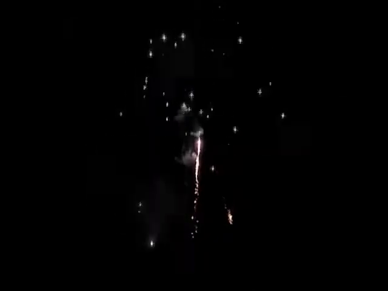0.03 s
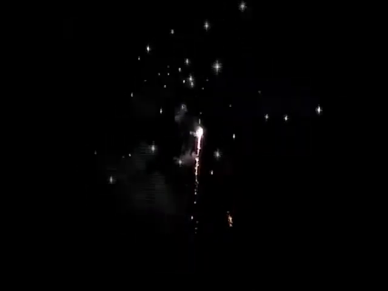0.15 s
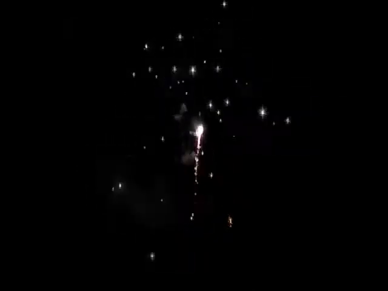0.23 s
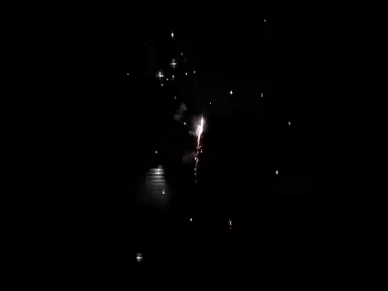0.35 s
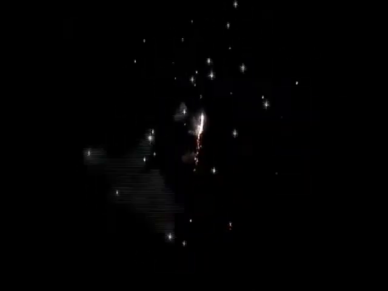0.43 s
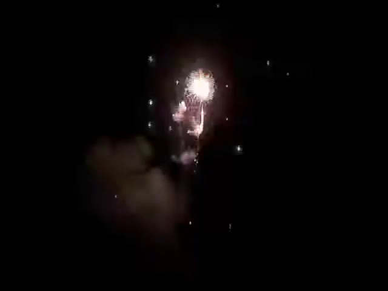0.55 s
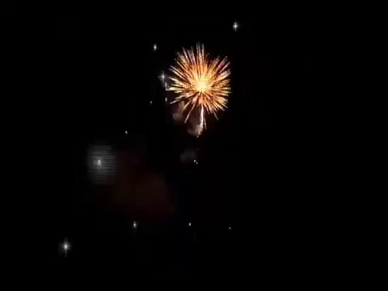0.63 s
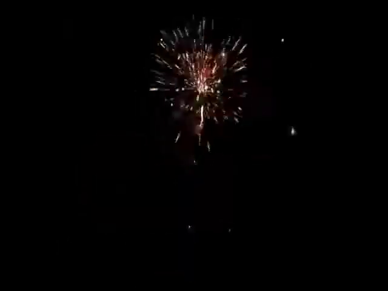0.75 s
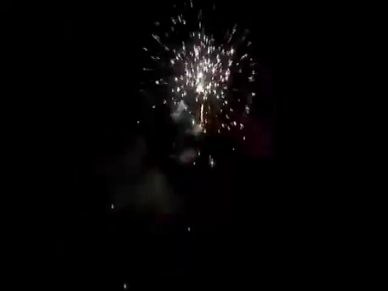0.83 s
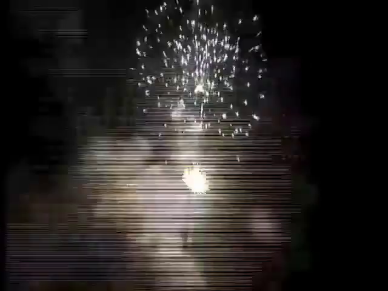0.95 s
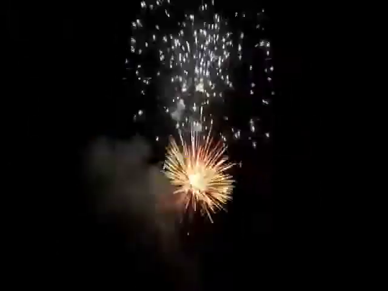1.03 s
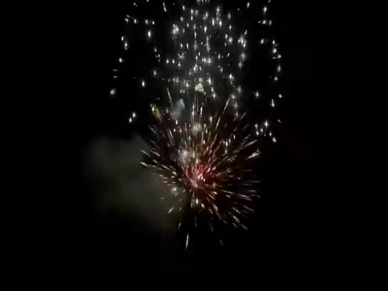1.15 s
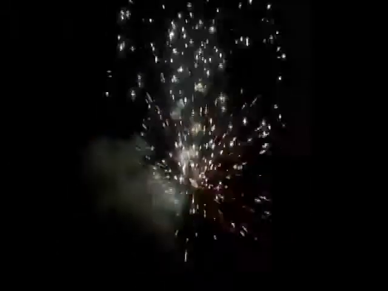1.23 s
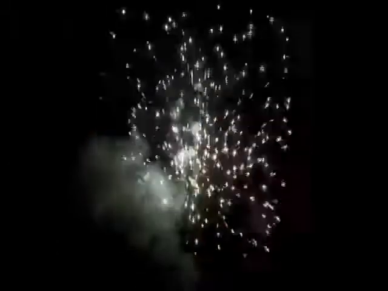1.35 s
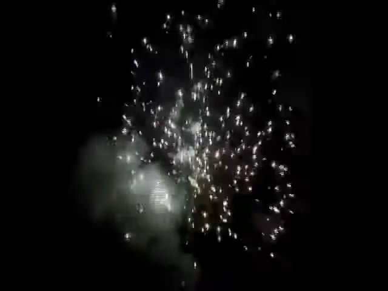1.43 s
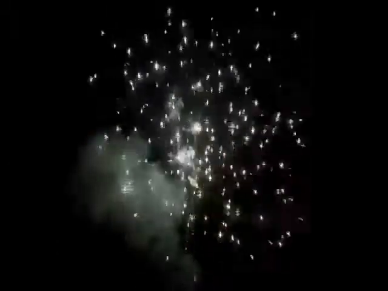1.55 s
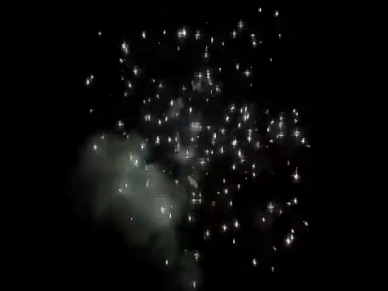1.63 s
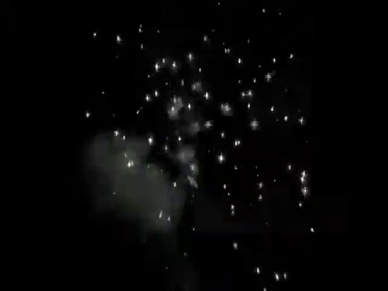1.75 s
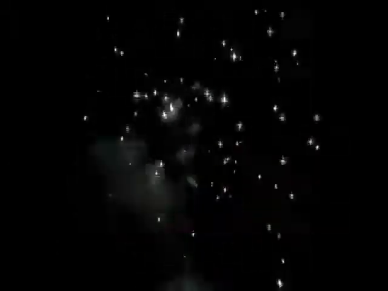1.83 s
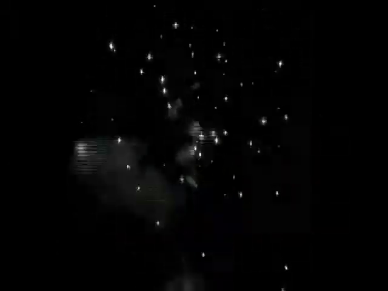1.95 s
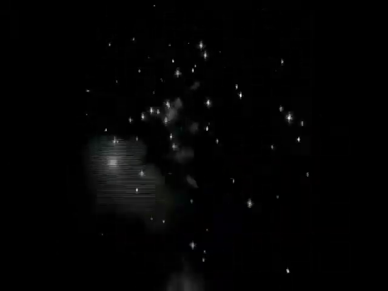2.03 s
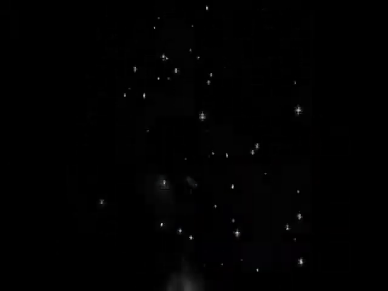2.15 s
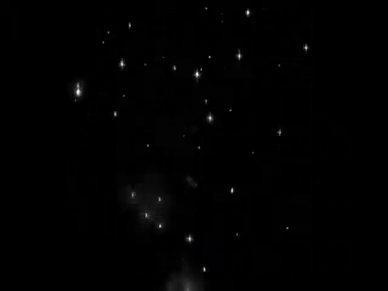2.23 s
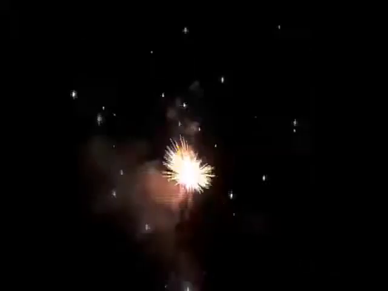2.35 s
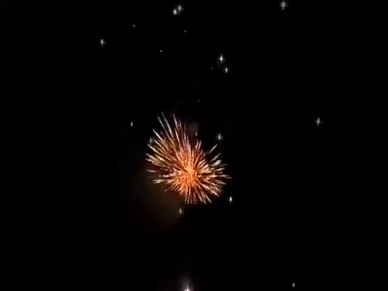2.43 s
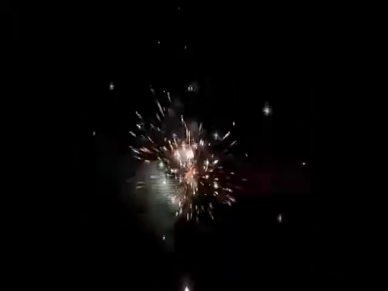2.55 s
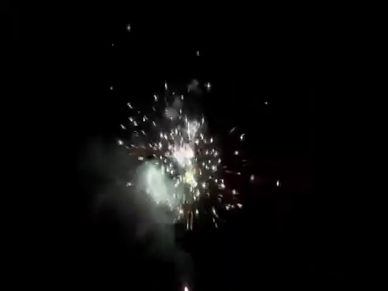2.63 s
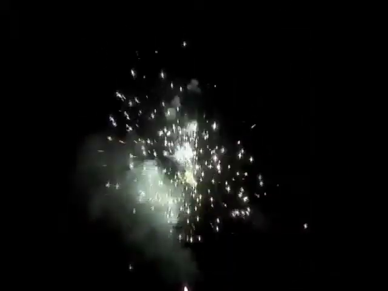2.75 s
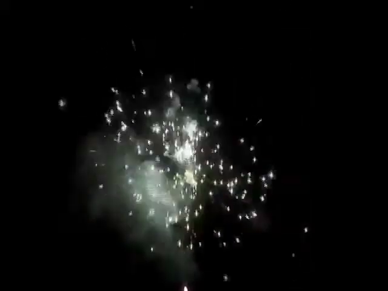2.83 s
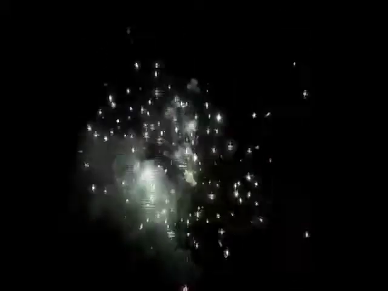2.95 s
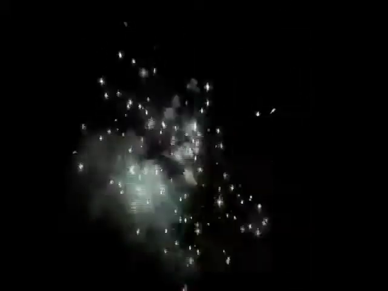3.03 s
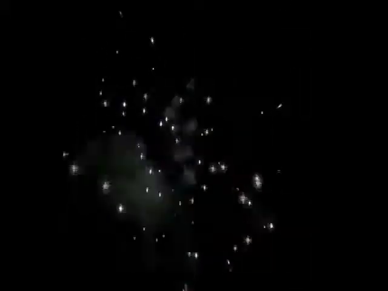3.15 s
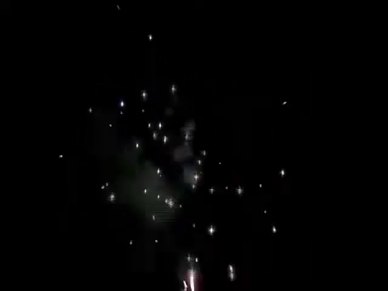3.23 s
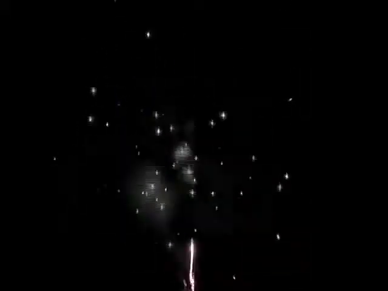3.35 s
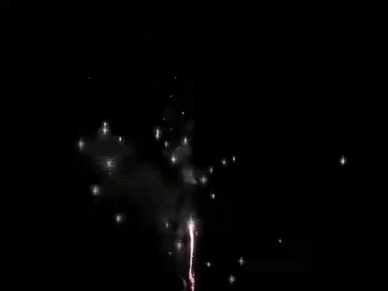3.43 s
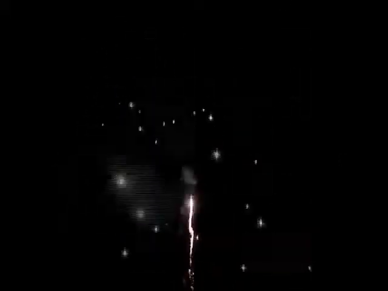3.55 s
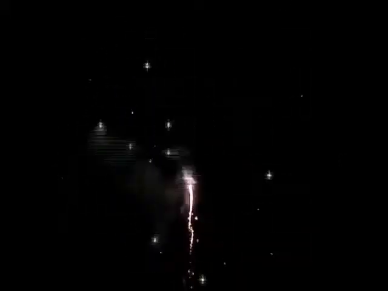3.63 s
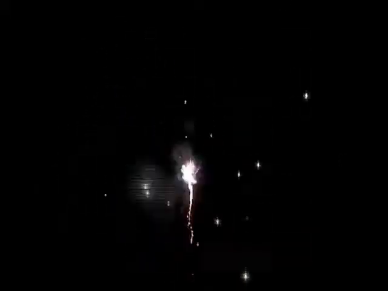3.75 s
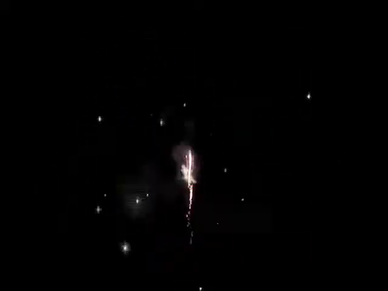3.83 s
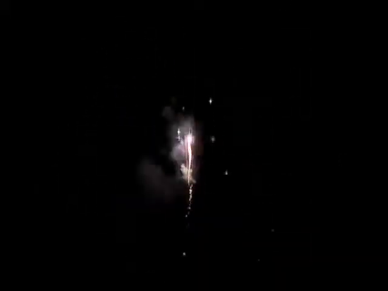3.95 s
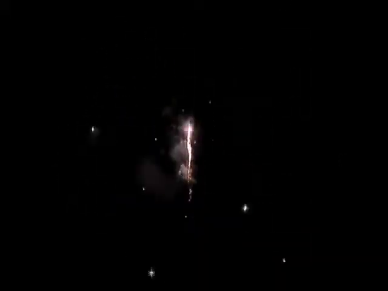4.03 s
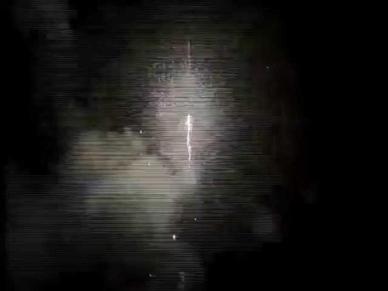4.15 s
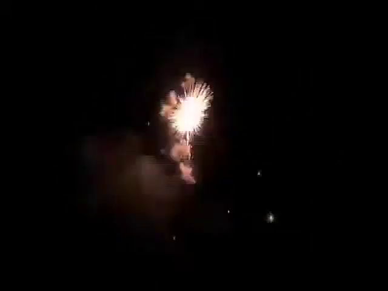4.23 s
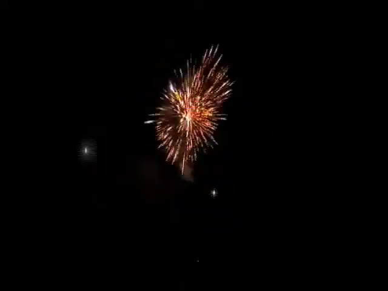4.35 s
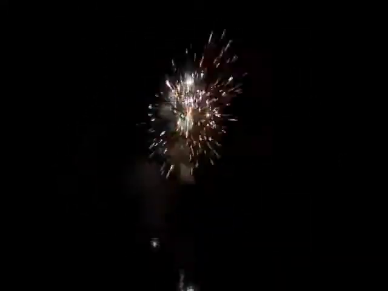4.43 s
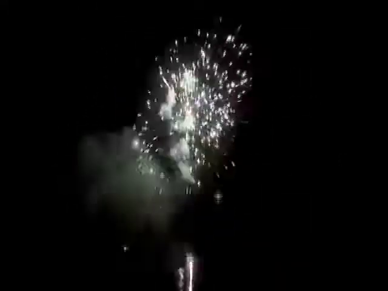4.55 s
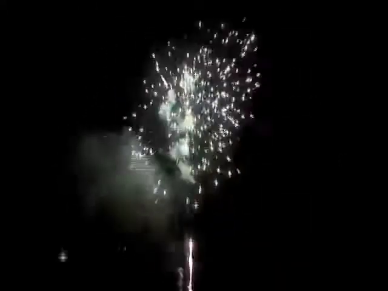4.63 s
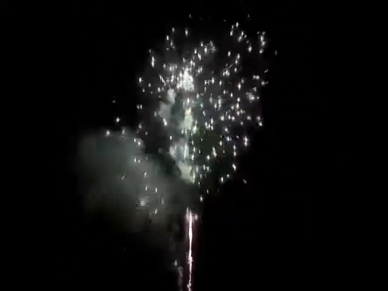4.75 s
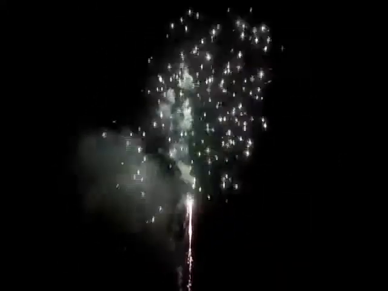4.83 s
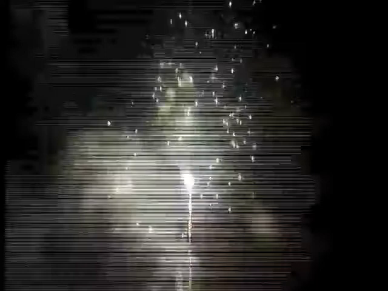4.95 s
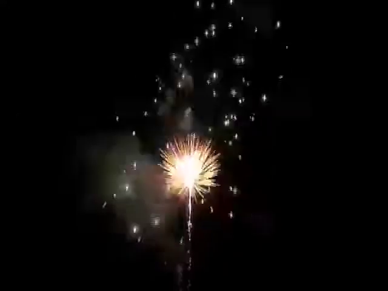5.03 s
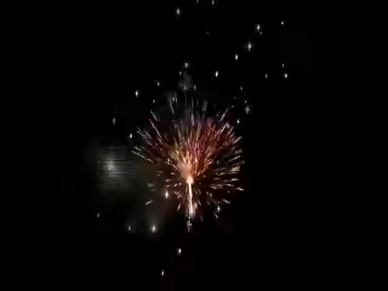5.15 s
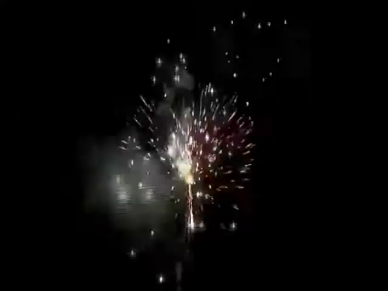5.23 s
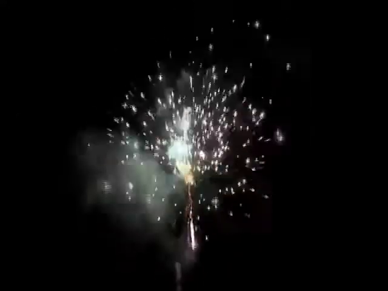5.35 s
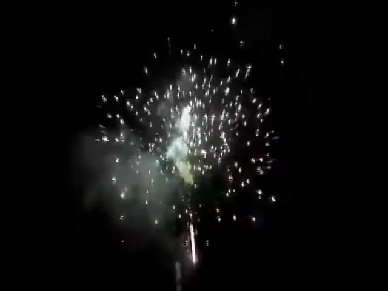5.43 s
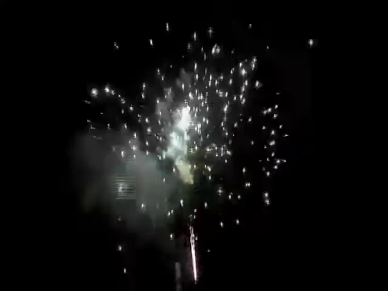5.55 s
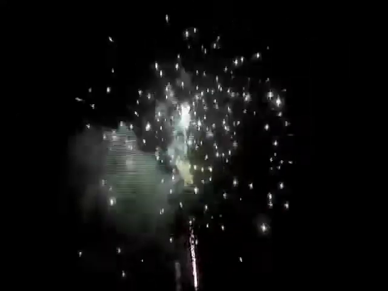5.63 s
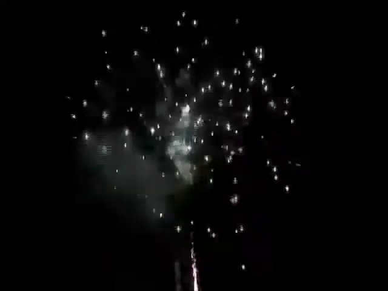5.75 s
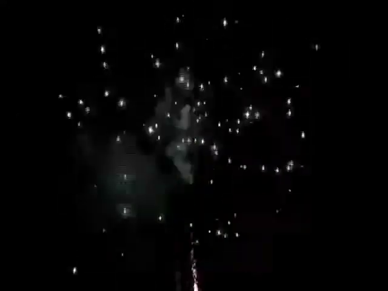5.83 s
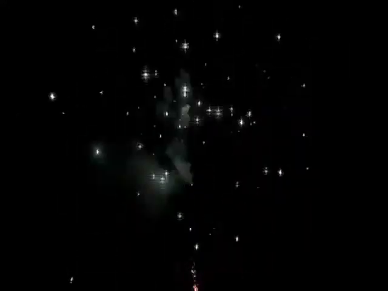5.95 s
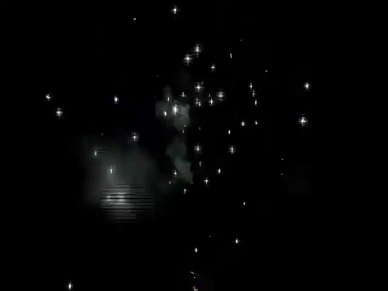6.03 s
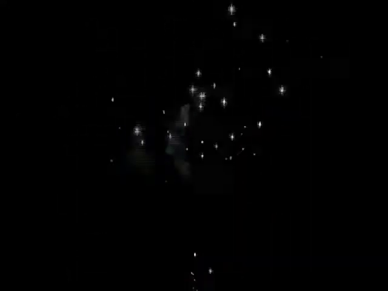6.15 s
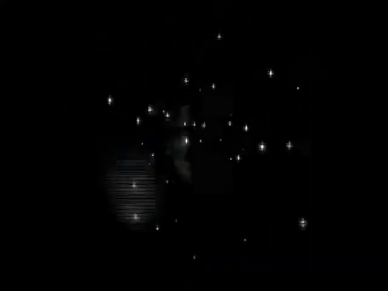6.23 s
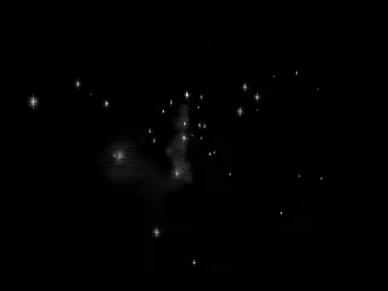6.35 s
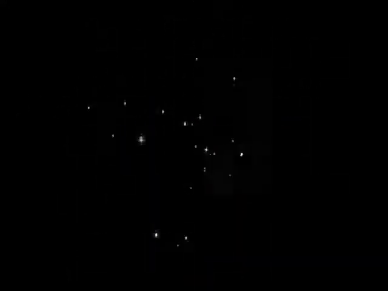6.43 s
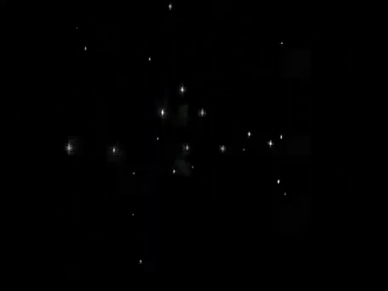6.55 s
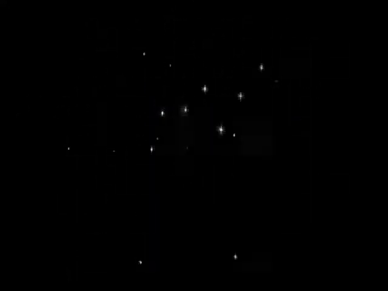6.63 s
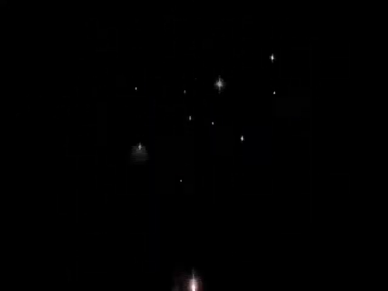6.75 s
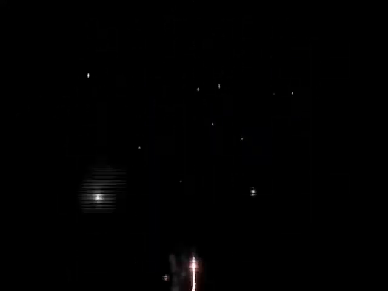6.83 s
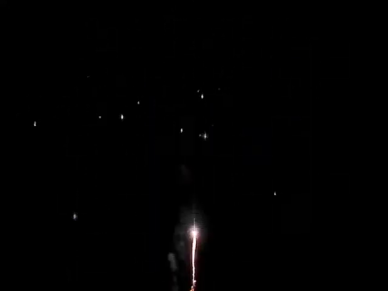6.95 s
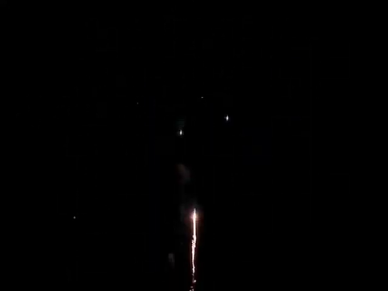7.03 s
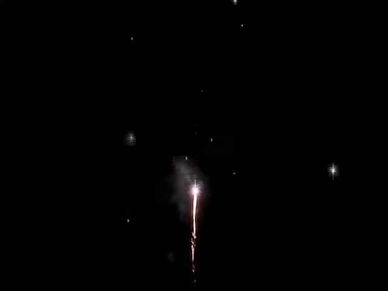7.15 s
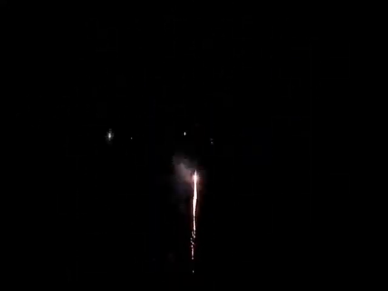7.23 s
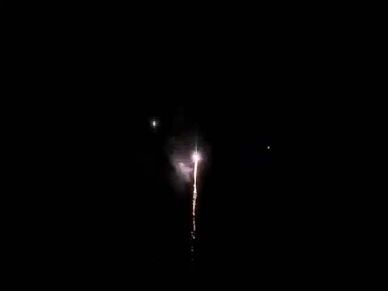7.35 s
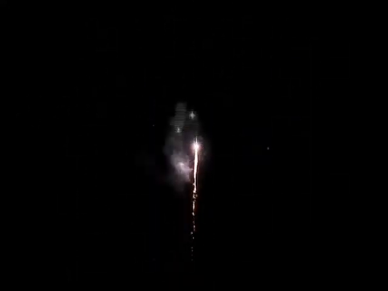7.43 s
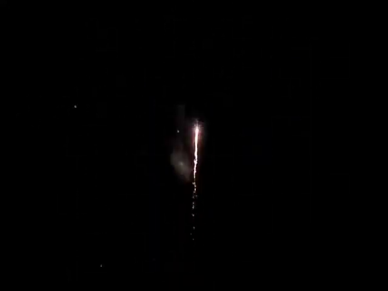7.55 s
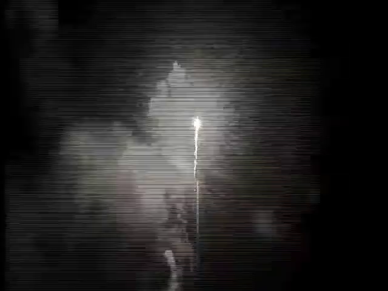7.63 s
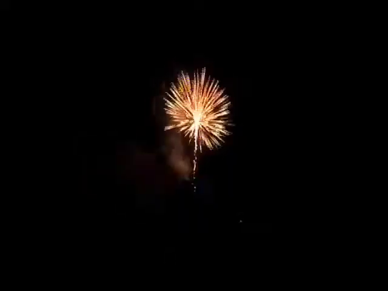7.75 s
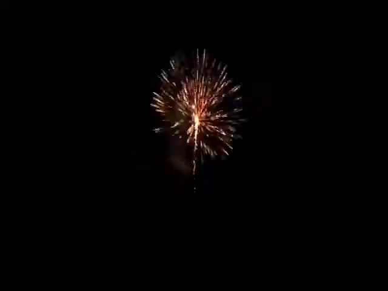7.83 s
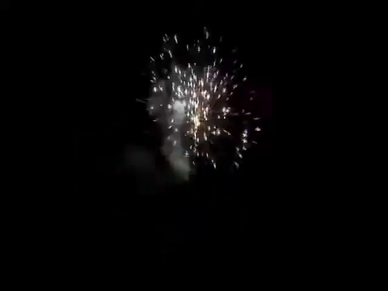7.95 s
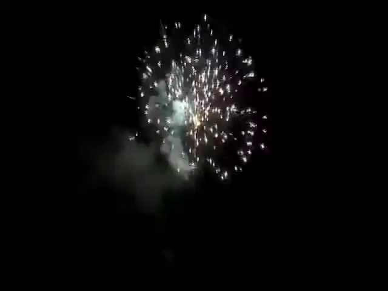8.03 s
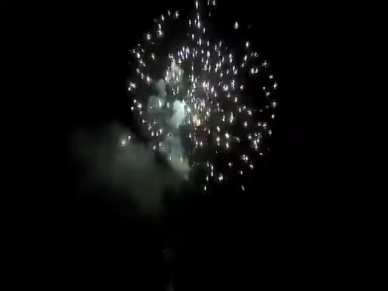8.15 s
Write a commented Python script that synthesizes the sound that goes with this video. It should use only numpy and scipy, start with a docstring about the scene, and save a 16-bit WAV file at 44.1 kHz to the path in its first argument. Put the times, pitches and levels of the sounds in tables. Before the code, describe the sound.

Sharp, booming firework bursts and shorter cracks of launch charges go off irregularly outdoors, loud enough to overload the microphone briefly. Every bang scatters into a grainy, hissing rumble that swells again just afterward. Dull thuds echo from far away over a quiet night hum, with a few faint ticks and, halfway through, a barely audible broken whistle. After a lull, a launch crack and a burst close the sequence as a quick double bang.

```python
"""A firework cake fires at night in the open. First an earlier burst still rolls over the night's hum,
and a dull thud returns from a far wall. Then shells burst overhead and lift charges crack at the ground:
shock fronts whose strongest peaks overload the microphone. Each is scattered into a rumbling, hissing
tail that swells again a fifth of a second later. Between them come more thuds, faint ticks (mostly far
echoes of the lifts) and, midway, a faint broken whistle. A last lift and burst fall almost together."""
import sys
import numpy as np
from scipy import signal
from scipy.io import wavfile

SR = 44100
rng = np.random.default_rng(int(sys.argv[2]) if len(sys.argv) > 2 else 0)


def log_audio(samples):
    """Write samples as a 16-bit WAV file to the path given in sys.argv[1]."""
    # one column per channel
    frames = np.atleast_2d(samples).T
    # limit to full scale, then quantise
    limited = np.clip(frames, -1, 1)
    pcm = np.round(limited * 32767).astype(np.int16)
    wavfile.write(sys.argv[1], SR, pcm)


N = 361179

# shell bursts: (time [s], front level [dB], boom level [dB], boom pitch [Hz],
# second crack delay [ms], second crack against the first [dB], tail level [dB])
BURSTS = [(0.7083, 0, -4.5, 180, 4.6, -2, 0.5), (1.0877, 2.5, -2.5, 198.4, 4, 0, 1),
          (2.4106, -1, -6, 185, 4.24, 5.5, 2), (4.314, 2, -4, 196.4, 4.9, 2.5, 1),
          (5.087, 3, -2.5, 200, 3.3, 4.5, 2), (7.7767, 1, -5, 202, 4.24, 4, 0.5)]
# lift charges: the same columns; a negative delay puts the second crack ahead
LIFTS = [(1.1632, -8.5, -16.5, 150, -1.3, -36, -6.5), (2.7092, -7.5, -9.5, 152, -0.396, -3.5, -3.5),
         (3.9525, -1, -7, 162, -2.2, -20.5, -2), (6.265, -5, -10, 158, -1.84, -10.5, -2.5),
         (7.7314, 2, -5.5, 153, -1.9, -15, -6)]
# noise band edges [Hz]: thirds of an octave, then sixths from 1600 Hz
BAND_EDGES_HZ = np.r_[25 * 2 ** (np.arange(18) / 3), 1600 * 2 ** (np.arange(21) / 6)]
STEP = 32   # samples per value of a slow envelope
LEAD_S = .004   # room ahead of a report's main front


def from_db(db):
    """Amplitude ratio of a level: tenfold for every 20 dB."""
    return 10 ** (np.asarray(db) / 20)


def rms_one(x):
    """Normalisation to unit mean power."""
    return x / np.sqrt(np.mean(x ** 2) + 1e-20)


def at_hz(points, hz):
    """Interpolation of a spectrum on a logarithmic frequency axis."""
    return np.interp(np.log(hz), np.log(np.array(points)[:, 0]), np.array(points)[:, 1])


def filtered(x, order, hz, kind="low"):
    """Maximally flat filtering, low-pass by default."""
    return signal.sosfilt(signal.butter(order, hz, kind, fs=SR, output="sos"), x)


def add(out, sound, s):
    """Superposition of a short stereo sound, starting at time s."""
    i = round(s * SR)
    out[:, i:i + sound.shape[-1]] += sound[..., :N - i]


def drift(corner_hz):
    """Random modulation: low-passed noise of spread about 1, one value every STEP samples."""
    pole = np.exp(-2 * np.pi * STEP * corner_hz / SR)
    white = rng.standard_normal(N // STEP + 2001)
    return rms_one(signal.lfilter([1], [1, -2 * pole, pole * pole], white)[2000:])


def band_gains(spectrum):
    """Band powers add: gains that give noise of this spectrum a total rms of 1."""
    gains = from_db(at_hz(spectrum, np.sqrt(BAND_EDGES_HZ[1:] * BAND_EDGES_HZ[:-1])))
    return gains / np.sqrt(np.sum(gains ** 2 * np.diff(BAND_EDGES_HZ)) / (SR / 2))


def banded_noise(gains, patchiness):
    """Partly coherent stereo noise, one row of gains in time per band; the bass is lumpier."""
    # likeness of left and right: (frequency [Hz], correlation [-1 to 1])
    likeness = [(60, 0.97), (99, 1), (160, 0.99), (270, 0.95), (450, 0.49), (740, 0.43), (1220, 0.46),
                (2010, 0.71), (3330, 0.99), (5500, -0.69), (9080, -0.41), (15000, 0.58)]
    out, together, sizzle = 0, drift(38), drift(161.7)
    white = rng.standard_normal((2, 2, N))
    for k, gain in enumerate(gains):
        edges = BAND_EDGES_HZ[k:k + 2]
        hz = np.sqrt(edges[0] * edges[1])
        mid, side = filtered(white[k % 2], 3, edges, "band")
        alike = np.clip(at_hz(likeness, hz), -1, 1)
        stereo = (np.sqrt(1 + alike) * mid + np.sqrt(1 - alike) * side * [[1], [-1]]) / np.sqrt(2)
        lumps_db = patchiness * (0.3 + 1 / (1 + hz / 700)) * (together + drift(21))
        lumps_db += 1.2 * sizzle * (hz > 1500)   # crackling stars make the upper bands grainy
        out = out + np.repeat(gain * from_db(lumps_db), STEP)[:N] * stereo
    return out


def roll_power(starts, scatter):
    """Incoherent summation: echo groups build up, hold and decay; one row of power per anchor."""
    t, power = np.arange(N // STEP + 1) * STEP / SR, 1e-15
    for delay, build_s, hold_s, *levels_db, fall, extra in scatter:
        falls = np.maximum(fall + extra * np.arange(len(levels_db)), 1)[:, None]
        for s, db in starts:
            after = t - s - delay
            grown = np.clip(after / build_s, 0, 1) ** 2
            decay_db = falls * np.maximum(after - build_s - hold_s, 0)
            power = power + grown * from_db(np.c_[levels_db] + db - decay_db) ** 2
    return power


def rolls():
    """Diffuse scattering: echoes merge into noise whose bands die at their own pace, down to the hum."""
    # anchors between which the tail's level is interpolated: (frequency [Hz])
    anchors_hz = [200, 1000, 2600, 9000]
    # groups of scatterers that answer a burst: (delay [s], build-up [s], hold [s],
    # level at each of the four anchors [dB], fall [dB/s], extra fall per higher anchor [dB/s])
    burst_scatter = [(0.0028, .012, 0, -22, -22.5, -28.5, -18.5, 99.6, -11),
                     (0.16, 0.03, 0.048, -30.5, -35, -30.5, -29, 130, 6.5),
                     (0.064, 0.071, 0.026, -39.5, -40, -36, -37, 18.8, 5.5),
                     (1.1, 0.11, 0.0, -46, -43.5, -53, -66.5, 21, -4)]
    # those that answer a lift: the same columns
    lift_scatter = [(0.00054, 0.0242, 0.011, -25, -19, -32, -35, 460, -14),
                    (.035, 0.038, 0.022, -32, -28.5, -32, -25.5, 96, -2.5),
                    (0.142, 0.036, .04, -39.5, -39.5, -34, -40, 143, 7),
                    (.1, .15, 0.0, -55, -48, -40.5, -63, 10, 11.5),
                    (.87, .03, 0.012, -48.5, -44, -48, -73, 150, -17)]
    # spectrum of the echoes: (frequency [Hz], relative density [dB])
    roll_spectrum = [(20, -48), (32, -16.5), (90, -4), (155, -1.5), (420, -7.5), (720, -16), (1050, -10),
                     (1500, -13.5), (2300, -14.5), (3200, -16), (4100, -25.5), (5900, -21.5), (6500, -43.5),
                     (9000, -38), (11500, -36.5), (14500, -45.5)]
    # spectrum of the night's hum: (frequency [Hz], relative density [dB])
    night_spectrum = [(20, -54), (32, -16.5), (180, -6), (420, -4), (680, -16), (1100, -11.5), (2000, -25),
                      (3300, -26), (4200, -30), (5700, -22.5), (6500, -39.5), (9500, -34.5), (10400, -30.5),
                      (11300, -37), (15500, -64.5)]
    # a burst that went off earlier and still rolls: (time [s], tail level [dB])
    earlier_burst = (-0.22, 0.0)
    power = roll_power([(s, tail_db) for s, *_, tail_db in BURSTS] + [earlier_burst], burst_scatter)
    power += roll_power([(s, tail_db) for s, *_, tail_db in LIFTS], lift_scatter)
    anchor_db = 10 * np.log10(power)
    place = np.interp(np.log(BAND_EDGES_HZ[1:]), np.log(anchors_hz), np.arange(len(anchor_db)))
    below = np.minimum(place.astype(int), len(anchor_db) - 2)
    band_db = anchor_db[below] + (place - below)[:, None] * (anchor_db[below + 1] - anchor_db[below])
    echoes = band_gains(roll_spectrum)[:, None] * from_db(band_db)
    hum = band_gains(night_spectrum)[:, None] * from_db(-53.5)
    return banded_noise(np.hypot(echoes, hum), patchiness=1.53)


def thud(out, s, level_db, hz, bump_db, rasp_db, pan_db):
    """Time spreading smears a far echo: first a rasp, then a few dull cycles, a tail and a lower bump."""
    t = np.arange(round(.14 * SR)) / SR - .014
    swell = lambda peak_s, width_s: np.exp(-((t - peak_s) / width_s) ** 2)
    phase = rng.uniform(0, 2 * np.pi)
    lag = np.array([[.3], [-.3]]) * hz / 400   # arrives from one side
    tone = np.sin(2 * np.pi * hz * t + phase + lag) * swell(0.0054, 0.0055)
    bump = from_db(bump_db) * np.sin(2 * np.pi * 195 * t + phase) * swell(0.014, 0.0062)
    noise = rng.standard_normal((2, len(t)))
    body = filtered(noise + noise[0], 2, [hz * 0.88, hz * 1.31], "band")
    tail = from_db(-11) * rms_one(body) * np.exp(-np.abs(t - .012) / 0.046)
    rasp = rms_one(filtered(noise, 3, [450, 1400], "band")) * np.exp(-(t - t[0]) / 0.056)
    gains = from_db(level_db + np.array([[.5], [-.5]]) * pan_db)
    add(out, gains * (tone + bump + tail + from_db(rasp_db) * rasp), s + t[0])


def thuds():
    """Discrete reflection: one wall returns each far thud and each burst, a farther wall each lift."""
    # dull thuds from far off: (time [s], level [dB], pitch [Hz], loss on return [dB])
    far_thuds = [(0.272, -28.5, 418, 1), (0.907, -26, 230, 15), (1.257, -27, 240, 21),
                 (1.866, -30, 386, 3.5), (2.268, -27.5, 408, 1.5), (3.154, -38.5, 343, 15),
                 (3.615, -28.5, 423, -0.5), (3.84, -36.5, 290, 19), (5.508, -29.5, 406, 2),
                 (6.298, -29, 407, 0), (6.817, -41, 450, 3), (7.492, -50, 453, 7.5), (7.686, -52, 210, 12)]
    wall_delay_s, far_wall_delay_s = .111, .89
    direct = dict(bump_db=-1, rasp_db=-13, pan_db=-2.5)
    wall = dict(hz=325, bump_db=-11, rasp_db=-14.5, pan_db=-3.5)
    far_wall = dict(hz=367, bump_db=3, rasp_db=-6, pan_db=-3)
    arrivals = [(s, db, dict(direct, hz=hz)) for s, db, hz, _ in far_thuds]
    arrivals += [(s + wall_delay_s, db - loss, wall) for s, db, _, loss in far_thuds]
    arrivals += [(s + wall_delay_s, tail_db - 31, wall) for s, *_, tail_db in BURSTS]
    arrivals += [(s + far_wall_delay_s, tail_db - 41.5, far_wall) for s, *_, tail_db in LIFTS]
    out = np.zeros((2, N))
    for s, db, timbre in arrivals:
        if s < N / SR:
            thud(out, s, db, **timbre)
    return out


def crack(t, front_s, ring_db, ring_s):
    """A shock front: compression, then weak rarefaction; it excites the microphone port's resonance."""
    port_hz = 2943
    push = (t >= 0) & (t < front_s)
    pull = (t >= front_s) & (t < 2 * front_s)
    ring = from_db(ring_db - 60 * np.maximum(t, 0) / ring_s) * (t >= 0)
    return push - 0.11 * pull + ring * np.sin(2 * np.pi * port_hz * t)


def report(shot, walls, front_s, ring_db, ring_s, boom_s, glide, rough_db, rough_s, dull_hz, heave_db):
    """A blast wave: two cracks (a ground bounce, or the primer ahead), then a low swing of air."""
    _, front_db, boom_db, boom_hz, second_ms, second_db, _ = shot
    t = np.arange(round(.09 * SR)) / SR - LEAD_S
    cracks = crack(t, front_s, ring_db, ring_s)
    cracks += from_db(second_db) * crack(t - second_ms / 1000, front_s, ring_db, ring_s)
    after = np.maximum(t - front_s, 0)
    turns = boom_hz * after * (1 + (glide * after) ** 2)   # the swings come ever faster
    swing = -np.sin(2 * np.pi * turns + 1) * np.exp(-(after / boom_s) ** 4) * (after > 0)
    heave_hz = 50   # slow motion of the air under the boom
    heave = from_db(heave_db) * np.sin(2 * np.pi * heave_hz * after) * np.exp(-after * heave_hz)
    boom = from_db(boom_db) * (swing - heave)
    # near scatter roughens the blast, a little differently at each port
    noise = filtered(rng.standard_normal((2, len(t))), 2, [450, 3900], "band")
    scatter = from_db(rough_db) * (noise + 1.11 * noise[0]) * np.exp(-after / rough_s) * (after > 0)
    direct = filtered(from_db(front_db) * (cracks + scatter), 1, dull_hz)
    # an uneven wall smears the cracks over a few milliseconds
    uneven = rng.standard_normal(300) * np.exp(-np.arange(300) / 88.0)
    smeared = signal.lfilter(uneven / np.linalg.norm(uneven), [1], direct)
    dulled = filtered(smeared + boom, 2, 2200)
    echoes = sum(from_db(db) * np.roll(dulled, round(s * SR), axis=1) for s, db in walls)
    return direct + boom + echoes


def reports():
    """Blast waves with early reflections: bursts boom long, lifts are a short crack."""
    # reflections of a burst from the nearest walls: (delay [s], level [dB])
    burst_walls = [(.024, -19), (.033, -16.5)]
    # those of a lift: (delay [s], level [dB])
    lift_walls = [(0.0116, -16), (.031, -14)]
    out = np.zeros((2, N))
    for shot in BURSTS:
        burst = report(shot, burst_walls, front_s=0.00024, ring_db=-1.5, ring_s=0.002, boom_s=0.0125,
                       glide=43, rough_db=-8, rough_s=0.0063, dull_hz=5660, heave_db=-12)
        add(out, burst, shot[0] - LEAD_S)
    for shot in LIFTS:
        lift = report(shot, lift_walls, front_s=0.00015, ring_db=1.5, ring_s=0.0071, boom_s=0.0058,
                      glide=10, rough_db=-7, rough_s=0.0038, dull_hz=3900, heave_db=-33)
        add(out, lift, shot[0] - LEAD_S)
    return out


def ticks():
    """Distant reflection: faint sharp ticks, mostly lift cracks echoing back, as octave-wide puffs."""
    # faint sharp ticks: (time [s], peak level [dB], centre frequency [Hz])
    arrivals = [(1.203, -33, 6000), (3.573, -36, 990), (3.6, -42, 1300), (7.162, -38, 1370),
                (7.178, -35.5, 1360), (7.195, -43, 1200), (7.323, -42, 2490)]
    out, t = np.zeros((2, N)), np.arange(round(0.043 * SR)) / SR
    for s, level_db, hz in arrivals:
        noise = rng.standard_normal((2, len(t))) * np.exp(-t / .003)
        puff = filtered(noise + noise[0], 3, [hz / np.sqrt(2), hz * np.sqrt(2)], "band")
        add(out, from_db(level_db) * puff / np.abs(puff).max(), s)
    return out


def whistle():
    """Narrow-band noise is heard as a pitch, here in short bell-shaped chirps."""
    # chirps of the broken whistle: (time [s], level [dB])
    chirps = [(3.648, -67), (3.7, -66), (3.868, -74), (3.912, -67.5)]
    hz, width_hz, chirp_s = 4900, 220, 0.019
    out, t = np.zeros((2, N)), np.arange(-.04 * SR, .04 * SR) / SR
    for s, db in chirps:
        thin = filtered(rng.standard_normal(len(t)), 2, [hz - width_hz / 2, hz + width_hz / 2], "band")
        add(out, from_db(db) * rms_one(thin) * np.exp(-(t / chirp_s) ** 2), s + t[0])
    return out


def scene():
    """Linear superposition: the pressures of all sources add."""
    return reports() + rolls() + thuds() + ticks() + whistle()


def record(dry):
    """Saturation and band limiting: the strongest peaks overload an input whose treble is soft."""
    ceiling, cutoff_hz = 0.89, 16400
    clipped = ceiling * np.tanh(dry / ceiling)
    soft = filtered(clipped, 1, 14000)
    return signal.sosfilt(signal.cheby2(14, 90, cutoff_hz, fs=SR, output="sos"), soft)


dry = scene()
out = record(dry)
log_audio(out)
```